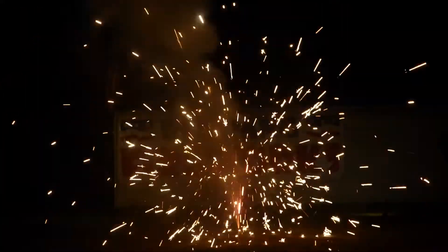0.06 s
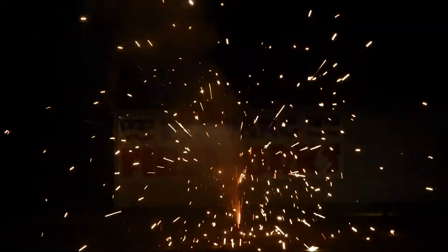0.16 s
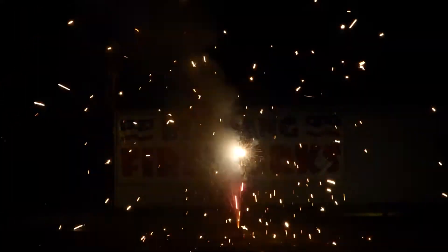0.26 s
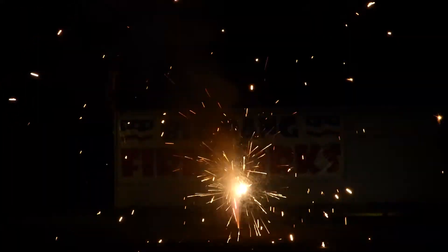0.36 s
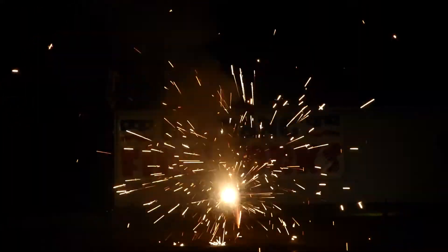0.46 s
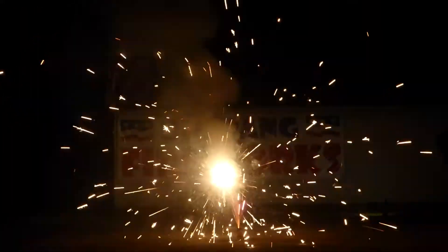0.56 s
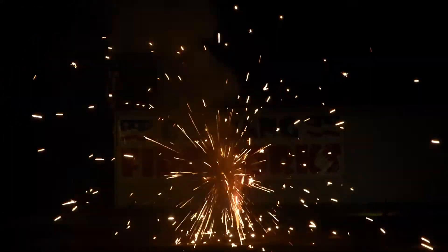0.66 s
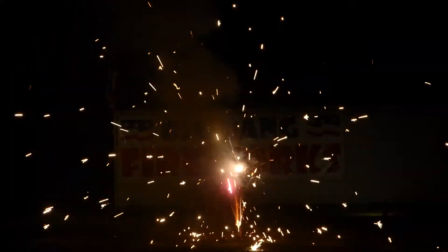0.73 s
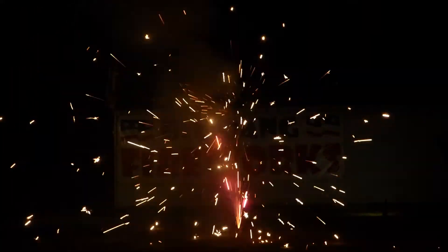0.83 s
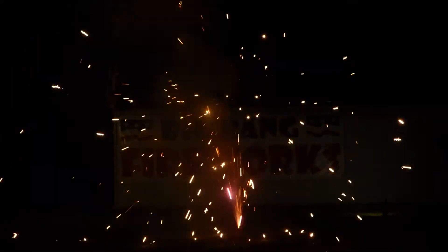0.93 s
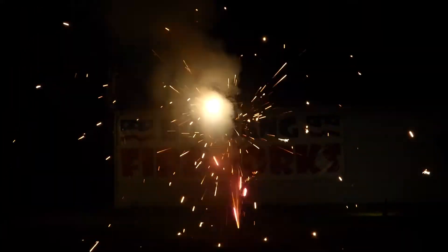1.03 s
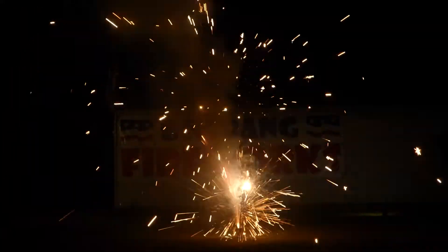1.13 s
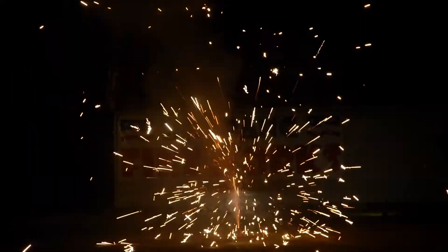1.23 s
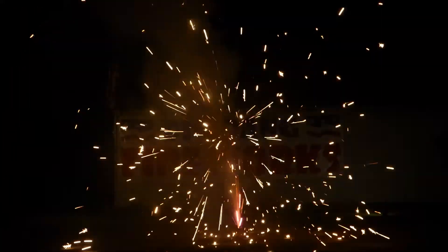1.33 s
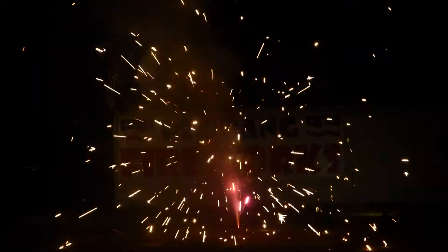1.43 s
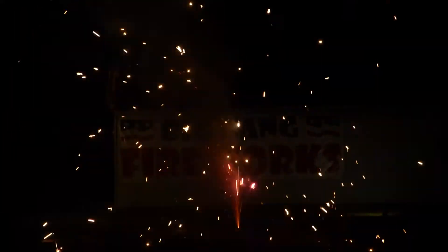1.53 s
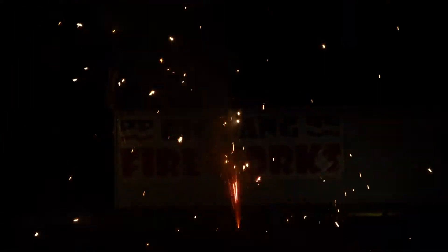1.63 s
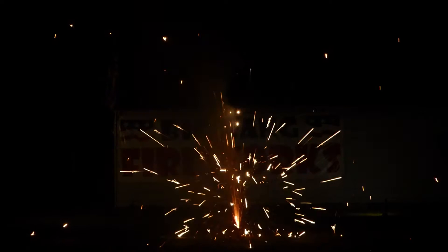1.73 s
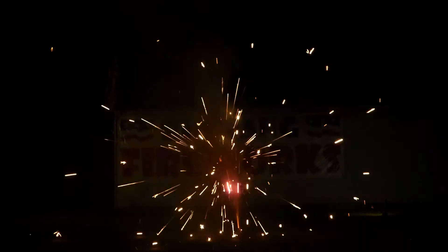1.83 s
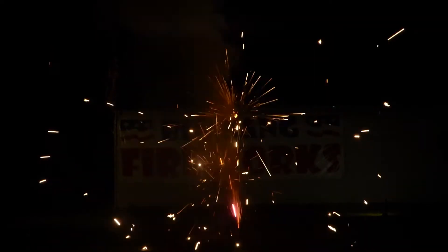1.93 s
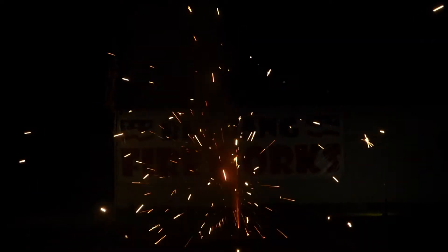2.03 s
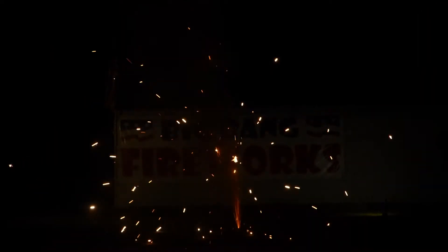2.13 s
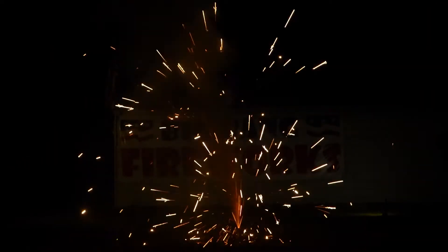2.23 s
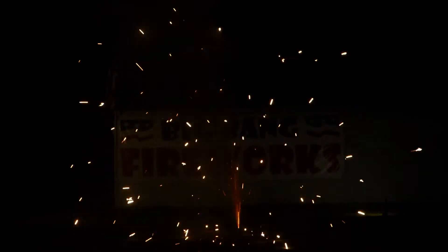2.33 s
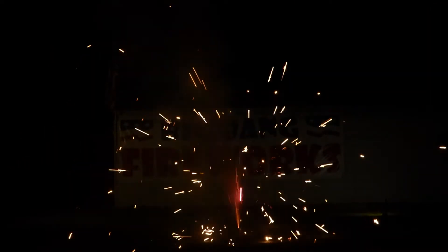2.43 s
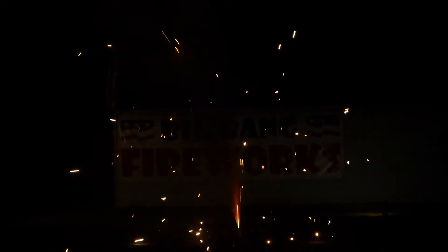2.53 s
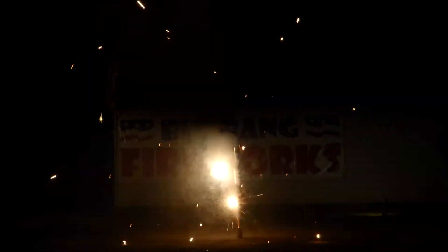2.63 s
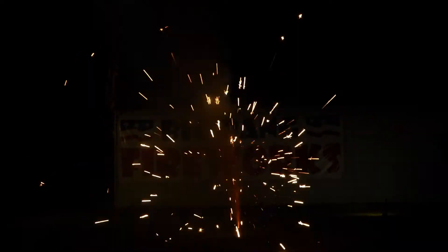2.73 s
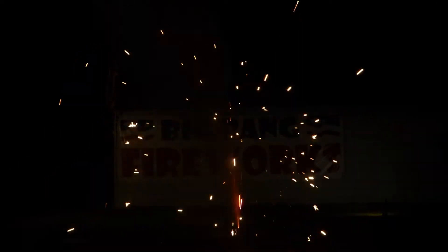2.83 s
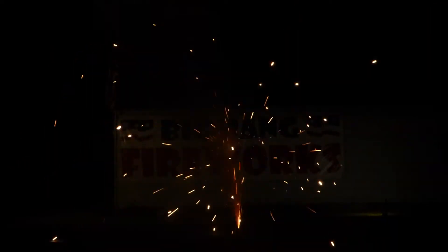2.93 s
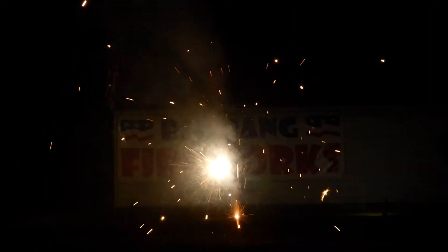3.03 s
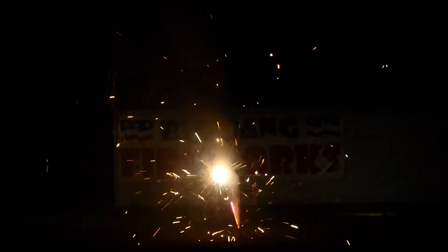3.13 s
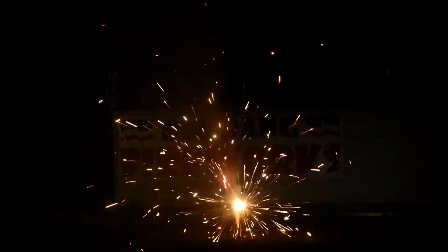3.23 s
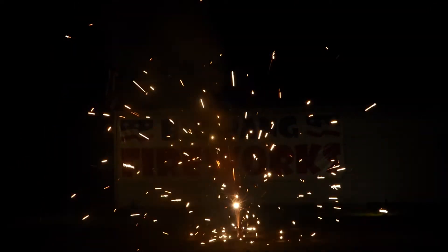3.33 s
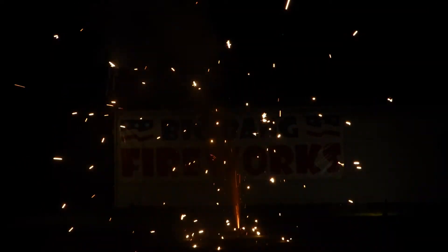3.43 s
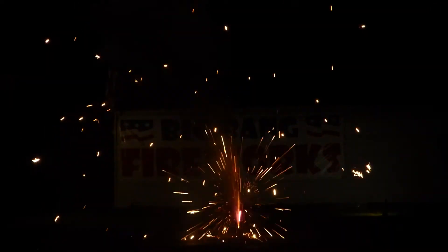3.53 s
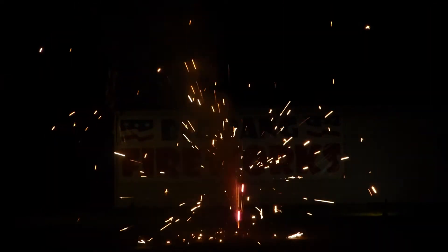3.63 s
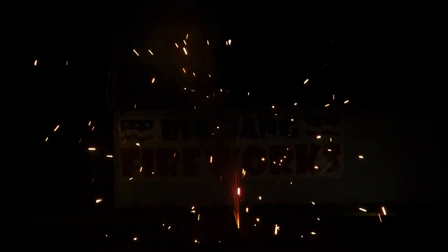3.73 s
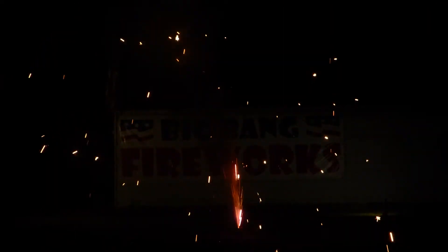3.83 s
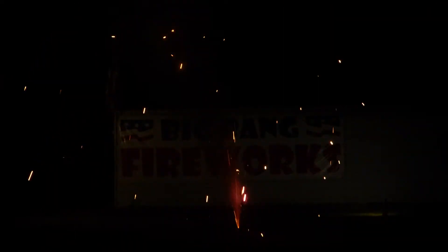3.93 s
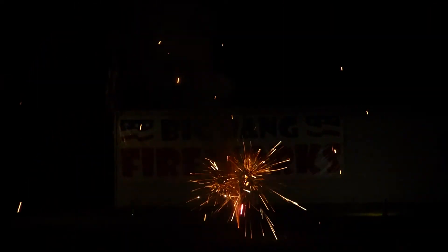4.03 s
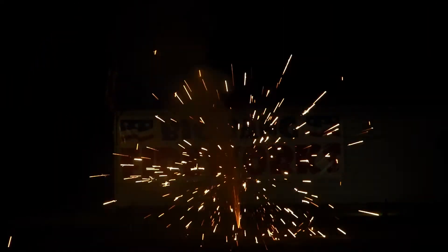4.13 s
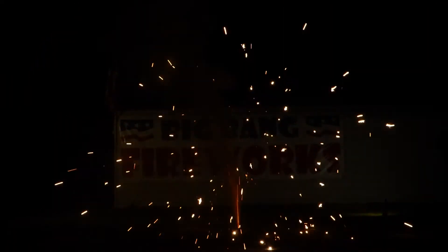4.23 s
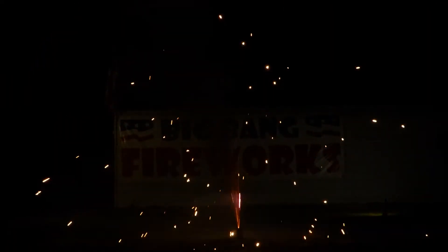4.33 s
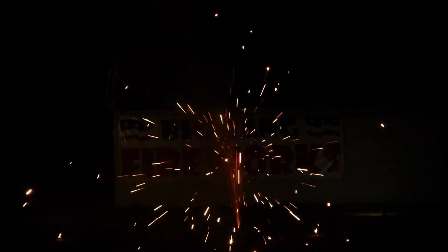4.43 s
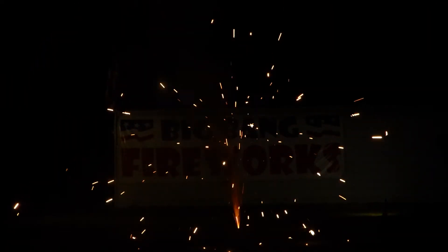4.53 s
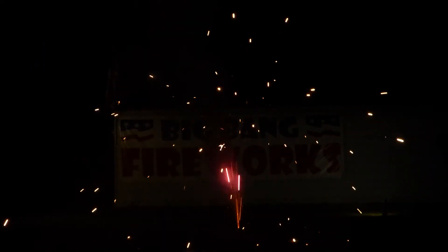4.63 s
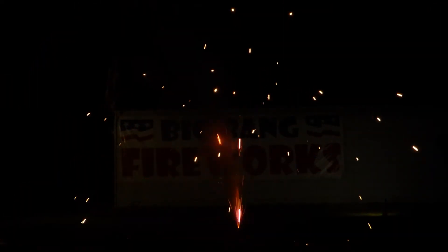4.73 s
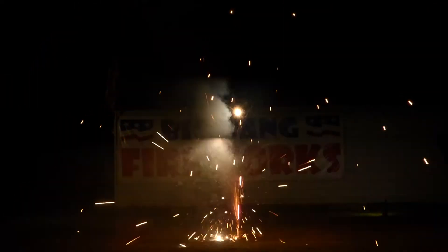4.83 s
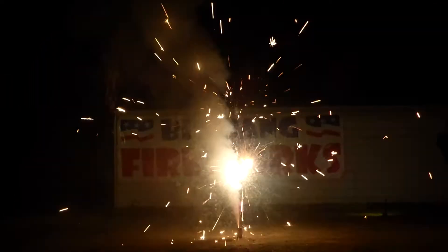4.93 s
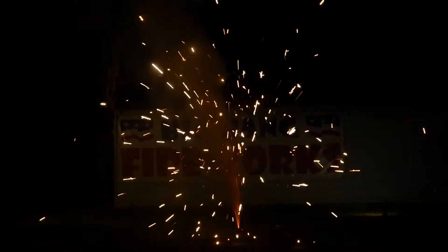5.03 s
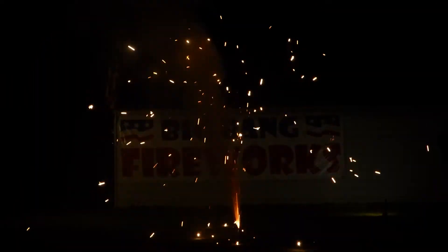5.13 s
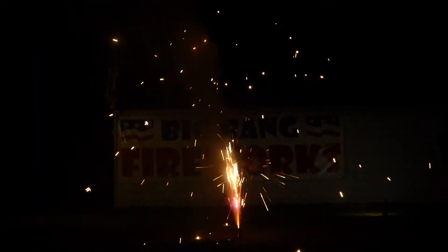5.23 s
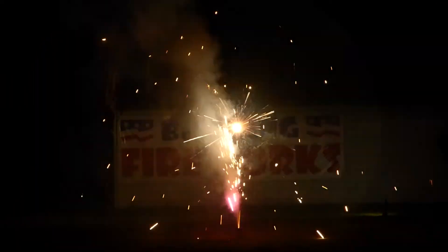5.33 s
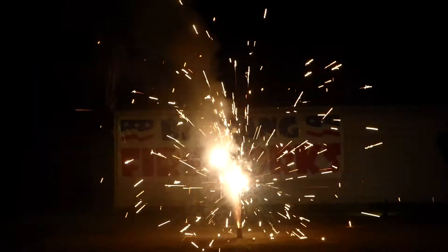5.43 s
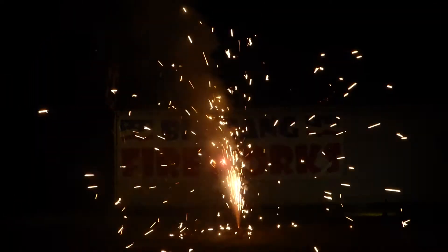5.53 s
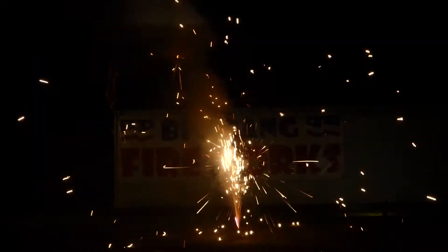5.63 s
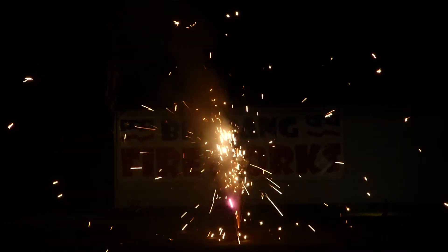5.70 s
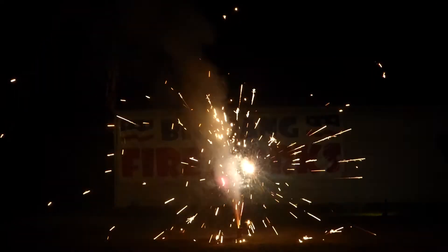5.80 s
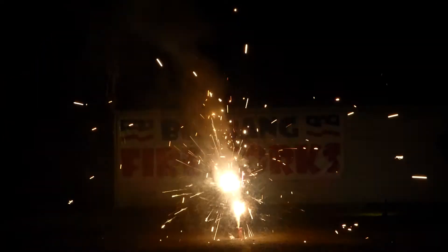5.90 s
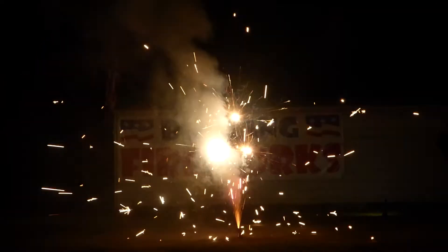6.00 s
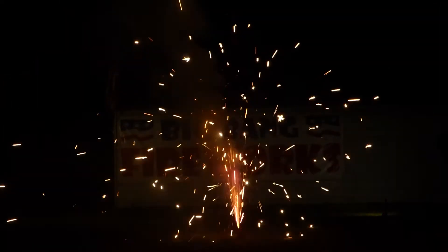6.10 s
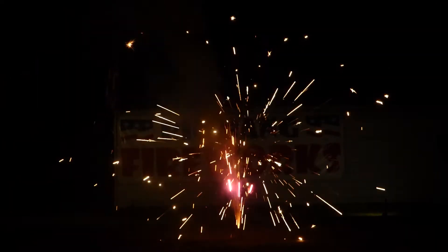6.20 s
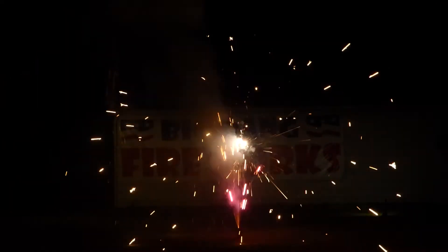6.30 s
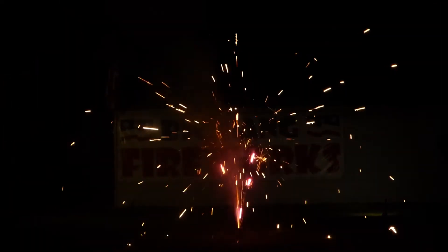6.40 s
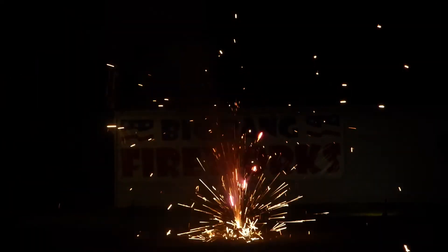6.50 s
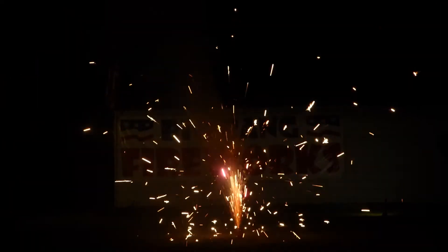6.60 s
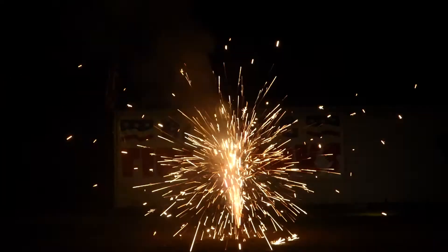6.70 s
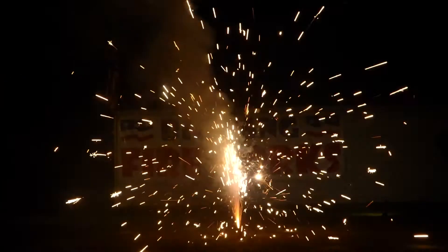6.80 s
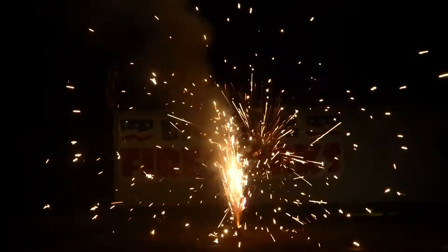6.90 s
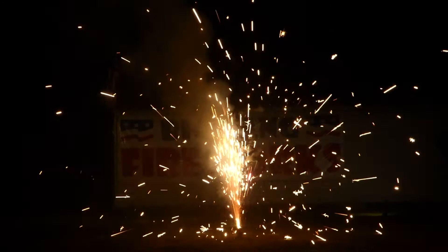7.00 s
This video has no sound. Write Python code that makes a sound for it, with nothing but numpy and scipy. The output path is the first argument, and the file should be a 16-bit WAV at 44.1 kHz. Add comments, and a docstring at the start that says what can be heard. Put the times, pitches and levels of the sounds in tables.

```python
"""A ground fountain burns outdoors at night, some metres from a camera; the yard already rings from pops before.
Stars crackle in a quick run, thin out after about 1.4 s, then come thick and mostly louder from 4.8 s on.
Each pop is a short pulse heard straight and once more off the ground; then walls around the yard answer
with filtered slaps and smears over a long noise tail, and surfaces beside the camera return bass.
Under it all a jet of sparks hisses softly (shaped noise), weakest at 2 s and strongest at 5.5 s, over a low rumble."""
import sys
import numpy as np
from scipy import signal
from scipy.fft import rfft, irfft, next_fast_len
from scipy.io import wavfile
from scipy.ndimage import map_coordinates

SR = 44100
rng = np.random.default_rng(int(sys.argv[2]) if len(sys.argv) > 2 else 0)


def to_wav(s):
    """Save 16-bit WAV."""
    ch = np.atleast_2d(s).T  # columns
    pcm = np.round(np.clip(ch, -1, 1) * 32767)  # PCM
    wavfile.write(sys.argv[1], SR, pcm.astype(np.int16))


N = 311333

# Bursting stars: t/s, relative level/dB, ground bounce lag/ms (grows with height), bass push over the level/dB
STAR_POPS = [(.0114, -16.5, .74, -2), (.0285, -13.5, .3, 7), (.032, -14.5, 0.55, 9), (0.0359, -10, 0.43, 0),
             (.066, -13.5, 0.42, 2), (.0713, -13.5, 0.47, 0), (0.1747, -10.5, 0.43, -1),
             (.254, -11, 1.22, 3), (0.299, -25, .4, -4), (0.3431, -18, 0.62, -5), (.373, -24.5, 0.75, -5),
             (.4233, -16, .5, -4), (.432, -26, 0.41, -9), (0.4382, -9.5, .4, 1.5),
             (0.4923, -11.5, 0.52, -1), (.506, -7, 0.6, -2), (0.5362, -12, .36, 1), (0.6179, -12.5, .46, 3),
             (.6452, -8.5, .5, 1), (.719, -10, .5, 4), (.8005, -11.5, .53, -2), (0.8304, -12, 0.75, 1),
             (.842, -11, 0.45, -1), (0.854, -19, 0.47, -5), (0.8556, -12, 1.03, -8), (1.0549, -13, .86, 0),
             (1.1046, -9.5, 1.08, 1), (1.1876, -15, .27, 5), (1.2067, -10, 0.45, -1), (1.258, -8, 0.44, 3),
             (1.329, -9.5, .44, 2), (1.376, -9, 0.84, -2), (1.4383, -9, 0.71, 1), (1.765, -8, .3, 2),
             (1.767, -10.5, 0.55, 1), (1.8816, -7, 0.57, 3.5), (1.966, -16.5, 0.47, -3),
             (1.9863, -9, 0.95, 0), (2.048, -17.5, 0.43, 0), (2.2353, -7, 0.88, -5), (2.252, -14, .26, -1),
             (2.44, -9.5, 0.47, 2.5), (2.7206, -10.5, .3, 1.5), (2.725, -11, .5, -1),
             (2.9395, -12.5, .6, -1), (3.102, -10, 0.56, 2.5), (3.121, -26, 0.24, 4),
             (3.1794, -16, 0.19, -1), (3.207, -11, .49, 5), (3.3054, -7.5, 0.28, 1.5),
             (3.366, -16.5, 0.42, -4), (3.3807, -16, 0.27, -7), (3.4187, -19, .36, -3),
             (3.4364, -15.5, 0.31, -1), (3.5766, -11, 0.3, 0.5), (3.6527, -4.5, 0.48, 2.5),
             (3.659, -21, 1.1, 5), (4.074, -15, 0.45, -7), (4.0918, -7.5, 0.51, -6), (4.1433, -5, .5, 0.5),
             (4.4334, -9, 0.55, 1), (4.8517, -6.5, 0.35, -1), (4.9071, -16, .21, 3), (4.922, -8, .93, -4),
             (4.9275, -4, 0.83, 11), (4.9716, -21, 0.48, -2), (5.0114, -5, .67, 1), (5.0151, -6.5, 0.5, -3),
             (5.044, -7, 0.44, -3), (5.2064, -17, .16, -3), (5.284, -10, 0.56, -11), (5.4075, -5, .93, 1.5),
             (5.4521, -10.5, 1.13, 0), (5.4528, -7.5, 0.43, -9), (5.478, -7.5, .39, -7),
             (5.5184, -4, 0.8, 0.5), (5.6263, -17.5, 0.91, 3), (5.6403, -9, 1.43, -11),
             (5.6857, -9.5, 0.52, -1), (5.689, -15.5, 0.38, -6), (5.746, -8.5, 0.65, 0),
             (5.8305, -5, 0.52, -2.5), (5.8813, -10.5, 0.47, -2), (5.9227, -11.5, 0.63, 5),
             (5.9723, -5.5, 0.46, 0), (5.9837, -9, .28, 2), (6.025, -22, .14, 12), (6.066, -5, 0.98, 0),
             (6.079, -8.5, .23, 0), (6.1601, -9, .48, -7), (6.2346, -6.5, 0.71, 0), (6.357, -7.5, 0.7, -2),
             (6.3955, -11.5, 0.78, -17), (6.4091, -18, 0.7, -9), (6.4374, -17.5, 0.4, -11),
             (6.4419, -18.5, 0.71, -14), (6.449, -23, 0.66, -3), (6.5604, -6.5, .18, 4.5),
             (6.5901, -24, .17, -19), (6.615, -22, 0.14, -1), (6.619, -6, .5, -5), (6.7462, -3.5, 0.53, 0),
             (6.7549, -10.5, .56, 2), (6.7617, -10, 0.62, 4), (6.8124, -9, 0.9, 1), (6.8523, -17, .42, -6),
             (6.8592, -22, .27, -4), (6.8881, -21.5, 0.48, 4), (6.9456, -7, 0.41, 3), (6.9563, -7, 0.7, 2),
             (6.9994, -19, 0.75, -9), (7.0161, -9, .32, 2)]
# Colour of a small blast through the microphone: f/Hz, relative level/dB
BLAST_COLOUR = [(30, -29.5), (110, -14), (200, -5.5), (500, -1.5), (900, -2.5), (1800, 0), (3300, -5),
                (5500, 0.5), (8500, 1), (11000, -2.5), (14000, -11.5), (15800, -18), (17000, -36.5)]
# Balance of the straight sound: f/Hz, left over right/dB
STRAIGHT_LEAN = [(200, 2.5), (600, -.5), (1500, -3), (5000, -0.5), (12000, -1)]
# Surfaces around the yard: lag/ms
WALL_LAGS = [.3, 2.1, 21.9, 41.1, 52, 63.5, 67.7, 121.6, 143, 162.5, 185.4, 243.3, 284.3]
# Their answers before filtering: left slap level/dB, right slap level/dB, smear level/dB, smear t60/ms, centre f/Hz
WALL_ANSWERS = [(-58, -60, -12.5, 30, 5500), (-23, -14, -12, 29, 2700), (-20.5, -18.5, -22, 32, 1860),
                (-18.5, -14, -13.5, 17, 2830), (-43, -24, -42, 42, 8900), (-40, -26, -20, 77, 2800),
                (-18.5, -4.5, -14.5, 37, 2150), (-47, -24, -21.5, 16, 6300), (-47, -38, -22, 23, 7700),
                (-28.5, -20.5, -22.5, 19, 6800), (-38, -31, -38, 24, 5500), (-29, -27, -26, 19, 2700),
                (-35, -25, -31.5, 16, 3800)]
# Decay of the diffuse tail: f/Hz, t60/s
TAIL_DECAY = [(100, 0.4), (300, 0.52), (800, 0.43), (2000, 1.31), (6000, 1.26), (12000, 0.42),
              (17000, 0.14)]
# What the tail favours: f/Hz, relative level/dB
TAIL_COLOUR = [(60, 12), (200, 0), (450, 9), (1000, -2), (2000, -3.5), (3300, -3), (6000, -9), (10000, -4),
               (14000, -6)]
# Surfaces beside the camera, which return only bass: lag/ms
NEAR_LAGS = [4.25, 8.9]
# Their returns ahead of the bass filter: level/dB
NEAR_LEVELS = [-8, -8.5]
# Colour of the hiss: f/Hz, relative level/dB
JET_COLOUR = [(60, -19.5), (300, -18.5), (1000, -20), (2800, -31), (6000, -18.5), (10000, -27),
              (15000, -34), (17000, -70.5)]
# Strength of the jet, ahead of its flutter: t/s, level/dB
JET_FLOW = [(0, -54), (2, -61), (4.8, -56), (5.5, -50), (7.06, -53)]
# Band splits of the recorder: f/Hz, width/Hz
BAND_SPLITS = [(130, 140), (1300, 2300), (3600, 1200)]

RUMBLE_HZ, TOP_HZ = 300, 16900  # a gentle split in the bass; the recorder's band limit
ANSWERS = 12  # differently drawn echo patterns, given to the pops in turn so the ringing varies
USUAL_DB = -10  # table level of an ordinary star
BOUNCE_DB, BOUNCE_SCATTER_DB = -2.5, 1.5  # on average the ground returns a little less than comes straight
SENT_DB, SENT_GROWS = 5, 0.22  # sent to the walls over the star's level; dB more for each dB of size
ALIKE_BELOW_HZ = 470  # the two ports sit close: long waves reach both nearly alike


def amp(db):
    """Turn dB into gain."""
    return 10 ** (np.asarray(db) / 20)


def along(points, hz):
    """Read a curve of (f/Hz, value) points on a log frequency axis."""
    f, v = np.transpose(points)
    return np.interp(np.log(hz + 1), np.log(f + 1), v)


def filtered(x, response):
    """Shape x by a complex response of frequency."""
    n = x.shape[-1]
    m = next_fast_len(n + 8192)
    return irfft(rfft(x, m) * response(np.fft.rfftfreq(m, 1 / SR)), m)[..., :n]


def causal(points, size=2048):
    """The minimum-phase pulse of this colour: its energy comes as early as it can; peak 1."""
    cepstrum = irfft(np.log(amp(along(points, np.fft.rfftfreq(size, 1 / SR)))))
    cepstrum[1:size // 2] *= 2
    cepstrum[size // 2 + 1:] = 0
    pulse = irfft(np.exp(rfft(cepstrum)))[:size // 2]
    return pulse / np.abs(pulse).max()


def spikes(s, gain):
    """Impulses placed between samples by a windowed sinc."""
    at = s[:, None] * SR
    near = np.floor(at).astype(int) + np.arange(-7, 9)
    shape = np.sinc(near - at) * np.cos(np.pi * (near - at) / 16) ** 2
    return np.bincount(np.clip(near, 0, N).ravel(), (gain[:, None] * shape).ravel(), N + 1)[:N]


def pair(shape, alike):
    """Left and right noise that share a part; alike is their correlation."""
    mid, side = rng.standard_normal((2, *shape))
    turn = np.arccos(np.clip(alike, 0, 1)) / 2
    left = np.cos(turn) * mid + np.sin(turn) * side
    right = np.cos(turn) * mid - np.sin(turn) * side
    return np.array([left, right])


def deep(hz, split_hz=450):
    """The bass share of a burst."""
    return 1 / (1 + (hz / split_hz) ** 2)


def with_bounce(s, gain, lag_ms, ground_db):
    """A burst travels straight and, a moment later, by way of the ground."""
    return spikes(s, gain) + spikes(s + lag_ms / 1000, gain * amp(ground_db))


def stars():
    """Every burst, its ground bounce, and the yard's answer to both; a bigger star stirs the yard more."""
    s, db, lag, thump_db = np.transpose(STAR_POPS)
    chance = rng.uniform(-1.01, 1, (len(s), 2))
    scatter = rng.standard_normal(len(s))
    bounce_db = BOUNCE_DB + BOUNCE_SCATTER_DB * scatter

    apart_s = 8e-6 * chance[:, 0]  # a star off centre reaches one port first
    crack = np.array([with_bounce(s + side * apart_s, amp(db), lag, bounce_db) for side in (1, -1)])
    thump = filtered(with_bounce(s, amp(db + thump_db), lag, bounce_db), deep)
    straight = filtered(crack, lambda hz: 1 - deep(hz)) + thump
    straight = filtered(straight, lambda hz: amp(along(STRAIGHT_LEAN, hz) * [[.5], [-.5]]))

    pattern = np.arange(len(s)) % ANSWERS
    far_lag = lag * (0.775 + 0.32 * chance[:, 1])  # the walls see the ground bounce from another angle
    sent_gain = amp(db + SENT_DB + SENT_GROWS * (db - USUAL_DB))
    echoes = np.zeros((2, N))
    for k in range(ANSWERS):
        sent = with_bounce(s, sent_gain * (pattern == k), far_lag, ground_db=-10.5)
        echoes += signal.oaconvolve(sent[None], yard(), axes=1)[:, :N]
    ringing = yard()[:, SR // 20:][:, :SR // 2]  # the yard still rings from pops before
    echoes[:, :SR // 2] += amp(-1.5) * ringing

    # narrow the stereo bass of the echoes
    apart = filtered(echoes[0] - echoes[1], lambda hz: 1 / (1 + (hz / ALIKE_BELOW_HZ) ** 4)) * 0.32
    echoes += [-apart, apart]
    return amp(5.5) * signal.oaconvolve(straight + echoes, causal(BLAST_COLOUR)[None], axes=1)[:, :N]


def yard(tail_db=-17, rise_s=0.0094, grain_db=4.0):
    """One answer of the yard: each wall sends a slap and a scattered smear; a diffuse tail lies under them."""
    hz, t, z = signal.stft(pair((SR,), alike=0.53), SR, nperseg=256)
    fade_db = along(TAIL_COLOUR, hz)[:, None] - 60 * t / along(TAIL_DECAY, hz)[:, None]
    tail = signal.istft(z * amp(fade_db), SR, nperseg=256)[1][:, :SR]
    tail *= 1 - np.exp(-np.arange(tail.shape[1]) / SR / rise_s)
    # many small far objects answer one by one; later they merge into a smooth wash
    lumps = map_coordinates(rng.standard_normal(SR // 60 + 4), [np.arange(SR) / 60])
    tail *= amp(grain_db * lumps * np.exp(-np.arange(SR) / SR / 0.11))
    answer = amp(tail_db) * tail / np.linalg.norm(tail[0])

    for lag, (left_db, right_db, smear_db, t60, mid_hz) in zip(WALL_LAGS, WALL_ANSWERS):
        burst = wall(lag, left_db, right_db, smear_db, t60, mid_hz, lumps, 0.84 * grain_db)
        # each echo's lag is varied a little at random
        varied_ms = lag + min(lag, 2) / 2 * rng.uniform(-.7, .7)
        start = round(varied_ms * SR / 1000)
        answer[:, start:start + burst.shape[1]] += burst
    return answer


def wall(lag, left_db, right_db, smear_db, t60, mid_hz, lumps, grain_db, bass_db=-3.0, bass_hz=1600):
    """A wall reflects a slap plus noise from its rough parts, in a broad band of its own with added bass."""
    ms = np.arange(SR // 20) / SR * 1000
    smear = pair(ms.shape, alike=0.86)
    grain = rng.permutation(lumps[::90]).repeat(45)[:len(ms)]  # level steps of about 1 ms
    smear *= amp(-60 * ms / t60 + grain_db * grain)
    burst = amp(smear_db) * smear / np.linalg.norm(smear[0])
    burst[:, 0] += amp(np.array([left_db, right_db]) + rng.normal(0, 0.49))

    def colour(f):
        band = 1j * f * 3.175 * mid_hz / (mid_hz ** 2 - f * f + 1j * f * 3.46 * mid_hz)
        return band ** 2 + amp(bass_db) / (1 + 1j * f / bass_hz) ** 2

    burst = filtered(burst, colour)
    return filtered(burst, lambda f: amp(-.045 * lag * (f / 10000) ** 2))  # air eats treble on a long path


def near_surfaces(x):
    """Bass comes again off surfaces next to the microphone, which are too small for the deepest notes."""
    def again(hz, low_hz=200, edge_hz=800):
        bass = np.exp(-(hz / edge_hz) ** 2) / (1 + (low_hz / (hz + 1)) ** 4)
        returns = sum(amp(db) * np.exp(-2j * np.pi * hz * lag / 1000)
                      for lag, db in zip(NEAR_LAGS, NEAR_LEVELS))
        return 1 + bass * returns

    return filtered(x, again)


def jet():
    """Soft hiss of the spray: coloured noise whose level follows the flow and flutters a little."""
    hiss = filtered(pair((N,), alike=0.55), lambda hz: amp(along(JET_COLOUR, hz)))
    flutter = map_coordinates(rng.standard_normal(N // 2000 + 4), [np.arange(N) / 2000])
    flow_db = np.interp(np.arange(N) / SR, *np.transpose(JET_FLOW))
    return hiss / hiss.std() * amp(flow_db + 1.2 * flutter)


def night():
    """Low outdoor rumble: noise rolled off above 40 Hz, nearly unrelated at the two ports."""
    air = filtered(pair((N,), alike=0.16), lambda hz: 1 / (1 + (hz / 40) ** 2))
    return amp(-70) * air / air.std()


def scene():
    """Stars with their reflections, over the jet and the night."""
    return near_surfaces(stars()) + jet() + night()


def record(dry):
    """Band splits let treble out ahead of bass; peaks round off; a band limit; zero sits slightly off."""
    def splits(f):
        turn = 1j * f - RUMBLE_HZ
        turn = turn / (1j * f + RUMBLE_HZ)
        for c, w in BAND_SPLITS:
            turn = turn * (c * c - f * f - 1j * f * w) / (c * c - f * f + 1j * f * w)
        return turn

    split = filtered(dry, splits)
    rounded = split / (1 + np.abs(split / .9) ** 4) ** .25
    return filtered(rounded, lambda hz: hz < TOP_HZ) - .0029


dry = scene()
out = record(dry)
to_wav(out)
```